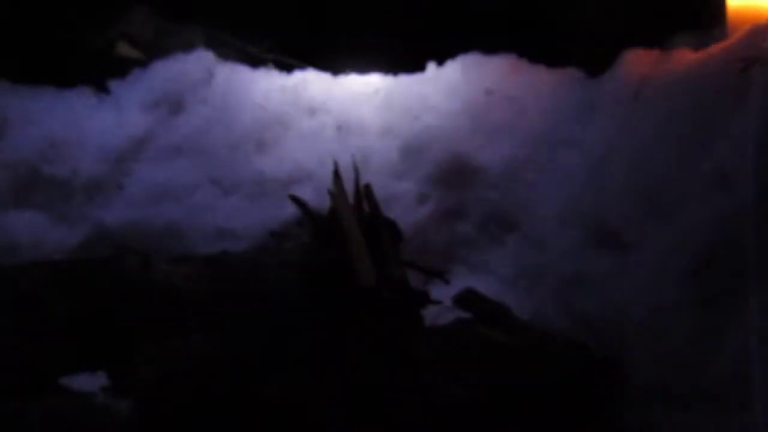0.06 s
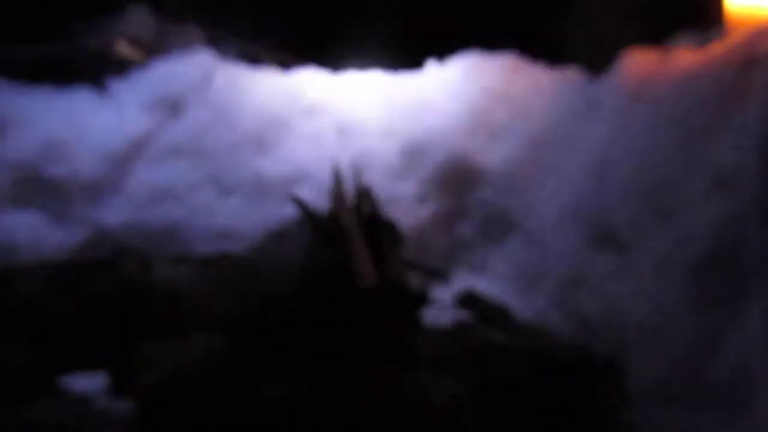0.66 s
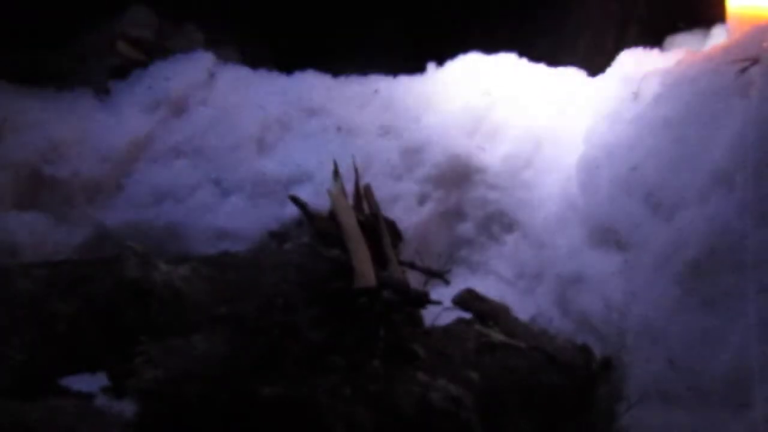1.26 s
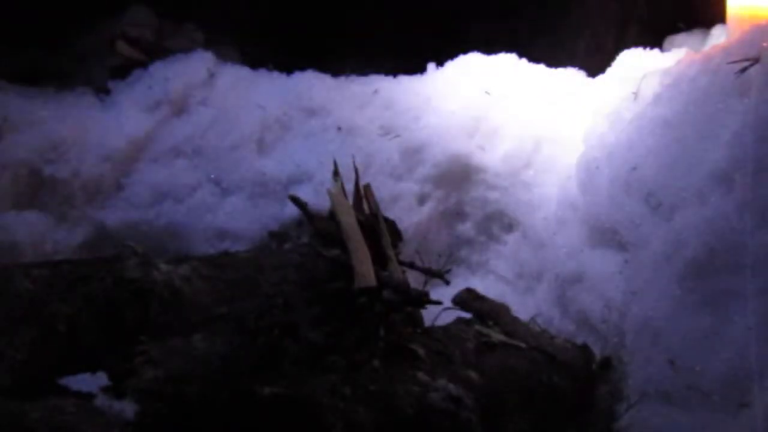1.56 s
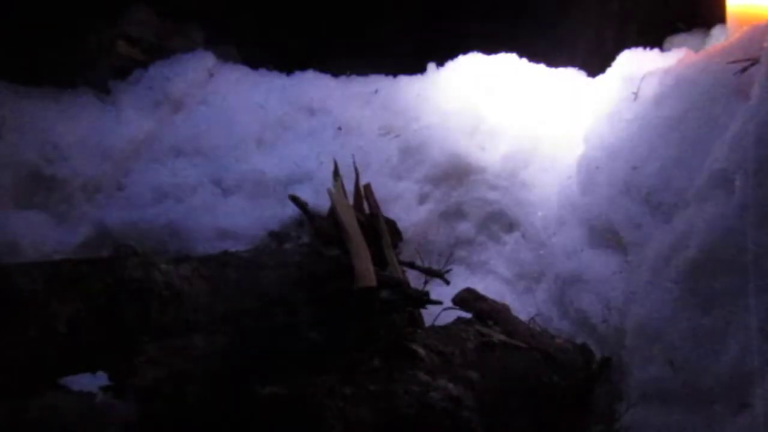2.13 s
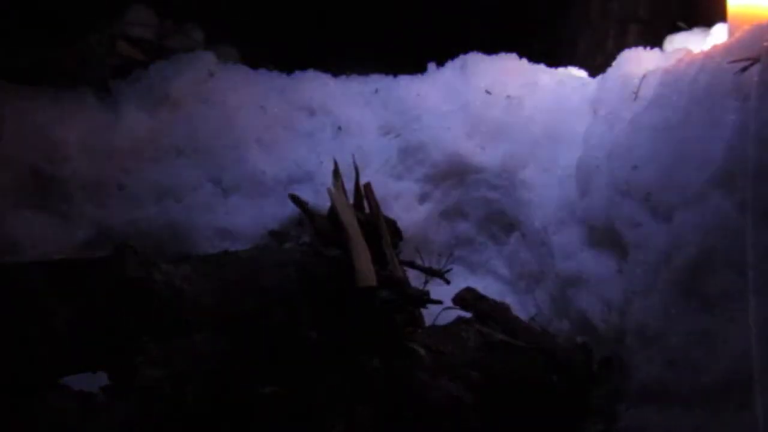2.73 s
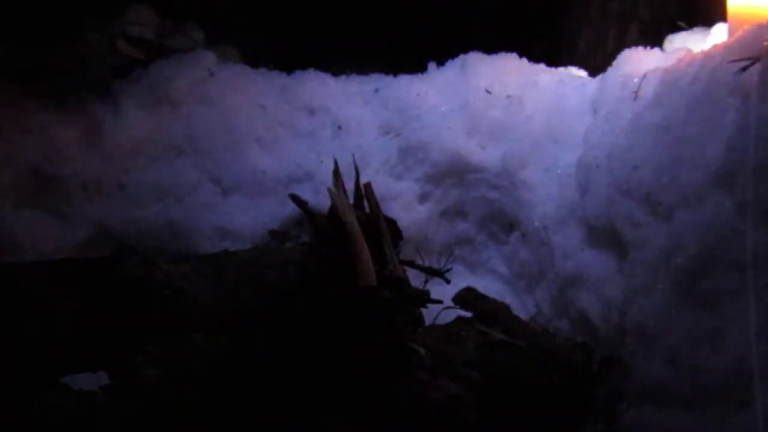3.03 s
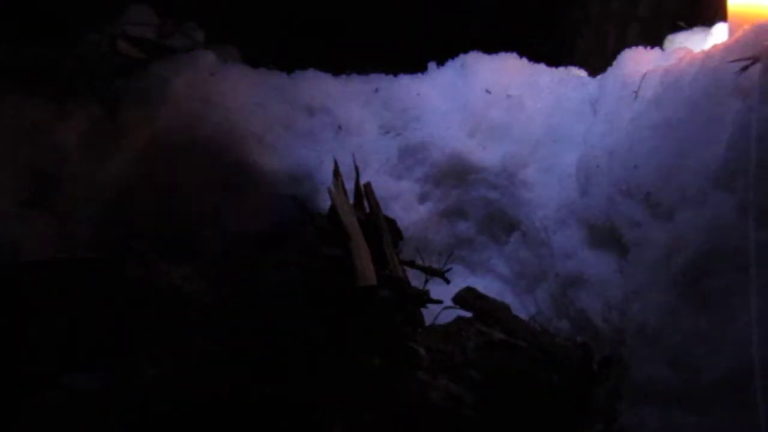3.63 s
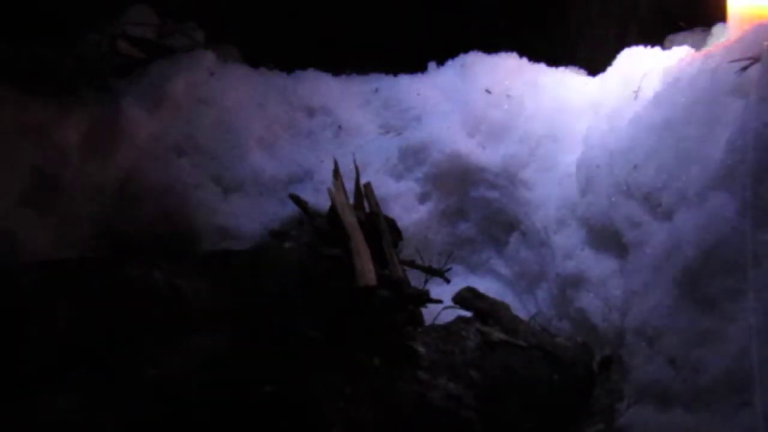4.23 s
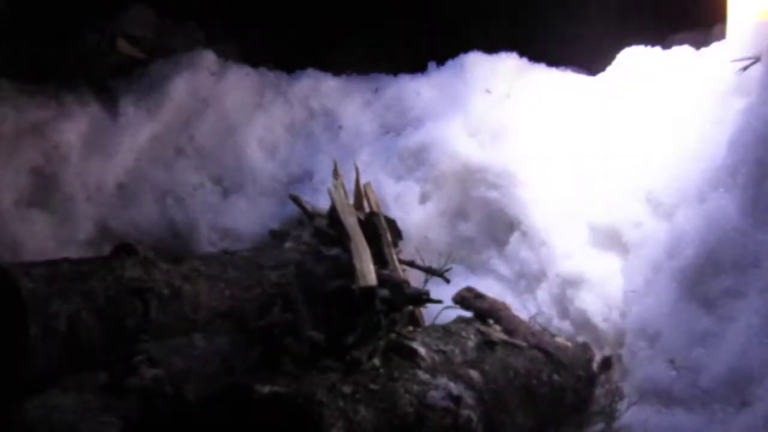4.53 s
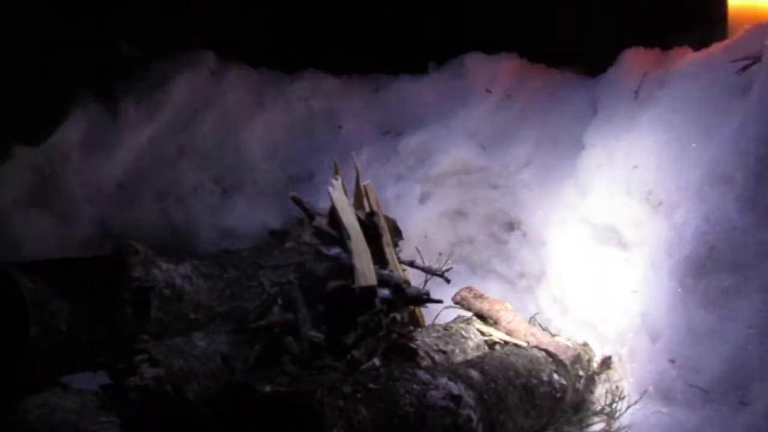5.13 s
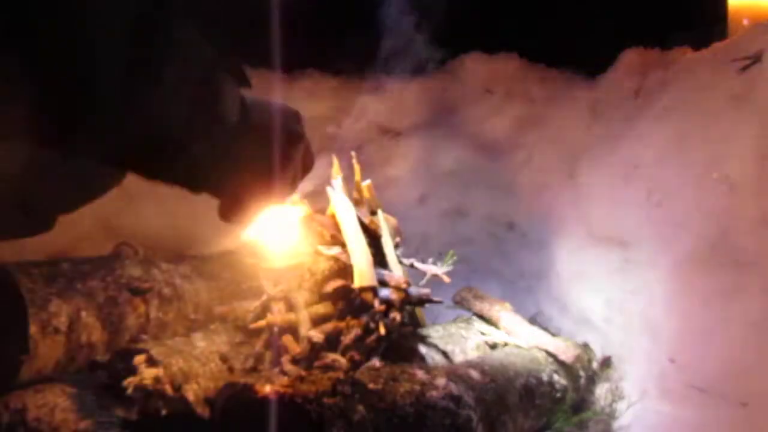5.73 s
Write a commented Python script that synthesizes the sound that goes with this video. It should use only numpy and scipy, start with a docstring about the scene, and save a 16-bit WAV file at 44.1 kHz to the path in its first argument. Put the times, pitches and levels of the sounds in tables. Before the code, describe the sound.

Sticks knock, snap and rustle close by as a small fire is laid, then a match is struck and flares.

```python
"""Sticks knock, scuff and snap as a small fire is laid in snow, close to the microphone.
Struck wood rings in damped modes; sleeves rustle in tiny friction slips; hands and logs thud on snow.
A cardboard matchbox slides open with a squeak and is turned in the fingers. A match is scraped once,
then struck at 5.1 s; gas from the burning head hisses and flares. The snow gives no reverberation."""
import sys
import numpy as np
from scipy import signal
from scipy.fft import rfft, irfft
from scipy.io import wavfile

SR = 44100
rng = np.random.default_rng(int(sys.argv[2]) if len(sys.argv) > 2 else 0)


def wav_record(signal):
    """Record a signal, one row per channel, as 16-bit PCM in the file named by sys.argv[1]."""
    frames = np.transpose(np.atleast_2d(signal))
    bounded = np.clip(frames, -1, 1)
    # unit amplitude maps onto the largest positive 16-bit level
    quanta = np.round(bounded * 32767).astype(np.int16)
    wavfile.write(sys.argv[1], SR, quanta)


N = 259749
TIME = np.arange(N) / SR
LEFT, NEAR_FRONT = 0.85, 0.32   # directions: 0 ahead, 1 full left

# Spectra of rubbing, dry hiss and grit. Each row: frequency in Hz, relative level in dB.
RUB_SPECTRUM = [(100, -40.5), (240, -15), (330, -1.5), (480, 2.5), (620, 1.5), (800, 0.5), (1100, -1),
                (1800, -4.5), (2600, -6.5), (3300, -20), (4200, -37), (8000, -64)]
HISS_SPECTRUM = [(1500, -5.5), (3000, 4.5), (4000, -5), (5000, 2.5), (6300, 2), (8000, -1.5), (10000, -5),
                 (12500, -11.5), (13800, -18), (15300, -34)]
GRIT_SPECTRUM = [(1500, -32.5), (3300, 9), (4300, 2.5), (5500, 8), (6400, 8.5), (7600, 3), (9300, 3),
                 (10500, -8.5), (13000, -4.5), (15800, -53)]


def kindling(rub):
    """Sticks knock, twigs snap into ringing splinters, and bark drags over bark."""
    # Each row: start in seconds, hiss in dB, rasp in dB, splinter pitch in Hz.
    snaps = [(.222, -33.5, -47, 5900), (0.274, -23.5, -23, 5500), (.448, -24.5, -30, 5630),
             (0.542, -30, -49, 6100), (0.5582, -28, -34.5, 6460), (0.608, -31.5, -27, 7060),
             (.764, -24.5, -29, 3650), (0.8338, -22.5, -25, 7000), (0.953, -33.5, -42, 7400),
             (1.042, -43, -52, 7600), (1.0657, -25.5, -30, 8200), (1.124, -34, -44, 5960),
             (1.163, -35.5, -34, 4300), (1.536, -36, -32, 5250), (1.554, -36, -44, 5560),
             (1.631, -42, -40, 2570), (2.088, -43, -38, 3000), (2.28, -23.5, -29, 6320),
             (2.445, -36, -32.5, 5220), (2.565, -26, -34, 4600), (2.936, -34, -47, 5770),
             (3.084, -46, -51, 5400), (3.343, -35, -38, 6840), (3.488, -46, -46, 5500),
             (3.531, -33, -41, 5940), (3.68, -29, -38, 6480), (3.987, -44.5, -69, 6950),
             (4.887, -37.5, -39, 5570)]
    # Each row: start in seconds, length in seconds, rasp in dB.
    scuffs = [(0.414, 0.022, -30), (.4245, 0.0059, -24.5), (0.441, 0.011, -26.5), (0.455, 0.034, -30),
              (0.475, .011, -35), (0.499, 0.026, -31), (0.718, 0.03, -34), (1.529, 0.02, -38),
              (2.311, 0.028, -37), (2.602, 0.012, -36), (3.572, 0.038, -35), (3.69, 0.017, -35),
              (3.758, 0.011, -34.5), (4.535, .025, -44.5)]
    snap_s, scuff_hiss_db = 0.00084, -6.5
    fractures = [(s, snap_s, rasp_db, hiss_db) for s, hiss_db, rasp_db, _ in snaps]
    drags = [(s, length_s, db, db + scuff_hiss_db) for s, length_s, db in scuffs]
    snap_gains = from_db(0.5) * bursts(fractures, rise_s=0.00017, fall_s=0.0032)
    rasp, hiss = snap_gains + bursts(drags, rise_s=0.00078, fall_s=0.0049)
    # Each row: frequency in Hz, relative level in dB.
    rasp_spectrum = [(150, -16), (450, 6), (900, 1), (1500, 0.5), (2050, 0.5), (2650, 3), (3400, -3),
                     (4200, -17), (7000, -39)]
    rasping = patchy(colour(friction(3900, 1.6, -0.37), rasp_spectrum), depth_db=3, rate_hz=46)
    hissing = colour(friction(7000, 2.4, -6.5), HISS_SPECTRUM)
    rings = splinters([(s, hiss_db - 1, hz) for s, hiss_db, _, hz in snaps], t60_cycles=185)
    wood = rasp * rasping + hiss * hissing + rings + stick_knocks(rub) + twig_clacks() + log_ring()
    return close_by(wood, LEFT)


def stick_knocks(rub):
    """Each blow rings a wooden stick's damped modes, with a contact tick and a short chatter; the blow at 5.1 s
    is the match knocking against the box as it is struck."""
    # Each row: start in seconds, level in dB, pitch in Hz, t60 in seconds. The row at 5.1012 s is the match
    # knocking the box during the strike.
    knocks = [(.0442, -24, 985, 0.03), (.199, -17, 1490, 0.017), (.2165, -20, 850, 0.024),
              (.2895, -11, 700, 0.017), (.4203, -9, 650, 0.013), (.4444, -13, 444, 0.029),
              (.501, -22, 650, .01), (.5797, -21.5, 764, 0.047), (.8341, -16, 890, 0.012),
              (.9148, -15, 1050, 0.011), (.9183, -12.5, 720, 0.034), (.9935, -21, 517, 0.035),
              (1.0119, -19.5, 280, 0.038), (1.1643, -23.5, 780, 0.028), (1.2322, -28.5, 840, 0.013),
              (1.271, -33, 1190, 0.023), (1.4722, -25, 1830, 0.012), (1.5848, -21, 395, 0.022),
              (1.5855, -26, 1800, .01), (1.7485, -28.5, 380, 0.01), (1.7707, -27, 483, 0.013),
              (1.84, -27.5, 203, 0.058), (1.8742, -16.5, 500, 0.021), (1.9055, -30, 640, 0.015),
              (2.3185, -18.5, 777, 0.033), (2.3988, -20.5, 730, 0.018), (2.5083, -11.5, 510, 0.037),
              (2.635, -26.5, 750, .022), (2.6525, -28.5, 720, 0.03), (2.72, -23, 777, 0.037),
              (2.786, -26, 710, 0.018), (2.9805, -18.5, 510, 0.021), (3.137, -29, 680, 0.0096),
              (3.207, -37, 715, .022), (3.5475, -12.5, 690, 0.011), (3.6809, -8, 716, 0.017),
              (3.6848, -16.5, 675, 0.047), (3.76, -21.5, 720, 0.018), (3.7678, -19, 518, 0.033),
              (3.824, -36, 700, 0.018), (4.1351, -27, 2100, 0.018), (4.1495, -35, 1990, 0.025),
              (4.18, -35, 1630, .025), (4.203, -25.5, 1780, 0.016), (4.2255, -33, 1350, 0.018),
              (4.3338, -36, 590, 0.058), (4.4025, -27.5, 1980, 0.011), (4.5402, -25.5, 600, 0.014),
              (4.5809, -26.5, 950, 0.015), (4.635, -30.5, 1980, 0.022), (4.669, -30, 2180, 0.016),
              (4.7367, -24, 574, 0.039), (4.7515, -28, 620, 0.028), (4.8022, -26, 1600, 0.0089),
              (4.807, -31, 575, 0.038), (4.8555, -30.5, 1000, 0.015), (4.8855, -23.5, 535, 0.028),
              (4.887, -24, 1870, 0.02), (4.903, -29, 1700, 0.015), (4.9789, -30.5, 583, 0.02),
              (4.994, -38, 553, 0.018), (5.053, -35, 480, 0.031), (5.0695, -34, 1010, 0.027),
              (5.0882, -23.5, 1700, 0.013), (5.0932, -24, 1700, 0.015), (5.1012, -10, 1870, 0.008),
              (5.3329, -19, 1300, 0.014), (5.488, -30, 1490, 0.0084), (5.5393, -25.5, 734, 0.026),
              (5.561, -29, 2130, 0.014), (5.8104, -25.5, 227, 0.045), (5.8562, -22.5, 550, 0.0099)]
    # Each row: multiple of the pitch, level in dB, multiple of the t60.
    stick_modes = [(.36, -31, 3.9), (0.681, 5.5, 1.24), (0.97, 18, 0.55), (1.401, 8.5, 0.91),
                   (2.2, -0.5, 0.54), (3.6, -45, 0.34)]
    blows = np.vstack([knocks, twig_ticks(rub, count=210)])
    ratio, mode_db, t60_ratio = np.transpose(stick_modes)[:, :, None]
    tick = colour(rng.standard_normal(N), GRIT_SPECTRUM)
    chatter = colour(friction(3000, 3.8, -3), RUB_SPECTRUM)
    out, t = np.zeros(N), TIME[:SR // 12]
    for start_s, level_db, hz, t60_s in blows:
        detune, strength = rng.standard_normal((2, len(stick_modes), 1))
        mode_hz = hz * ratio * np.exp(0.04 * detune)
        modes = np.sin(2 * np.pi * mode_hz * t) * from_db(mode_db + 1.5 * strength)
        swell = 1 - np.exp(-t * hz * ratio / 0.42)   # soft wood: builds over about a cycle
        ring = np.sum(modes * swell * from_db(-60 * t / (t60_s * t60_ratio)), axis=0)
        at = int(start_s * SR)
        n = min(len(t), N - at)
        hit = ring[:n] / np.abs(ring).max()
        hit += from_db(-28) * tick[at:at + n] * np.exp(-t[:n] / 0.0009)
        hit += from_db(-14.5) * chatter[at:at + n] * np.exp(-t[:n] / (0.23 * t60_s))
        out[at:at + n] += from_db(level_db) * hit
    return out


def twig_ticks(rub, count):
    """Knock rows for small twigs that touch at random, louder with stronger rubbing."""
    low_hz, high_hz, t60_cycles, over_rub_db, spread_db = 429, 2570, 15.2, 4, 8.5
    when, size, pitch = rng.random((count, 3)).T
    at = (when * (N - 1)).astype(int)
    hz = low_hz * (high_hz / low_hz) ** pitch
    level_db = 20 * np.log10(rub[at]) + over_rub_db + spread_db * size
    return np.column_stack([TIME[at], level_db, hz, t60_cycles / hz])


def twig_clacks():
    """Dry twigs ring on one clear note; faint overtones die sooner."""
    # Each row: start in seconds, level in dB, pitch in Hz, t60 in seconds.
    clacks = [(.199, -21.5, 2200, .012), (.8342, -19.5, 2360, .014), (1.067, -33, 3150, .014),
              (2.5645, -23, 2650, 0.051), (2.9365, -25.5, 1725, 0.034)]
    # Each row: multiple of the pitch, level in dB.
    twig_modes = [(1, -3), (1.2, -19), (1.78, -16), (2.76, -14)]
    out, t = np.zeros(N + SR), TIME[:SR // 15]
    for start_s, level_db, hz, t60_s in clacks:
        at = int(start_s * SR)
        for ratio, mode_db in twig_modes:
            envelope = from_db(level_db + mode_db - 60 * t * np.sqrt(ratio) / t60_s)
            out[at:at + len(t)] += envelope * np.sin(2 * np.pi * hz * ratio * t)
    return out[:N]


def log_ring():
    """Harder knocks ring the log under the kindling with a hollow note."""
    # Each row: start in seconds, level in dB.
    log_hits = [(0.291, -25.5), (.446, -24), (0.839, -25), (.866, -22.5), (0.92, -17), (1.021, -20.5),
                (2.511, -21.5), (3.685, -27)]
    # Each row: frequency in Hz, level in dB, t60 in seconds.
    log_modes = [(492, -5, 0.075), (850, -12, 0.08), (1300, -33, 0.025)]
    t = TIME[:SR // 5]
    ring = sum(from_db(db - 60 * t / t60_s) * np.sin(2 * np.pi * hz * t) for hz, db, t60_s in log_modes)
    return signal.oaconvolve(impulses(log_hits), ring)[:N]


def splinters(rows, t60_cycles):
    """Thin splinters ring on two close modes. Each row: start in seconds, level in dB, pitch in Hz."""
    out, t = np.zeros(N + SR), TIME[:SR // 25]
    for start_s, level_db, hz in rows:
        at, phase = int(start_s * SR), 2 * np.pi * hz * t
        ring = (np.sin(phase) - np.sin(1.1 * phase)) / 2
        out[at:at + len(t)] += ring * from_db(level_db - 60 * hz * t / t60_cycles)
    return out[:N]


def match_strike():
    """The head grinds over the gritty striker, shakes the box and cracks as it catches."""
    # Each row: start in seconds, length in seconds, rasp in dB, grit in dB, box ring in dB.
    strokes = [(4.2438, .001, -34, -27, -37), (4.247, .0045, -28, -23, -26.5),
               (4.254, .0015, -33, -31, -38), (4.258, .006, -38, -37, -39), (5.083, .015, -44, -54, -57),
               (5.1007, .0012, -35, -37, -48), (5.1040, .001, -23, -24, -37),
               (5.110, .006, -20, -20.5, -34), (5.116, .04, -29.5, -31, -43)]
    # The box behind the striker. Each row: frequency in Hz, width in Hz, level in dB.
    striker_modes = [(1410, 140, -3), (1670, 140, -6), (2230, 150, 3), (2980, 290, -1), (3390, 250, 5),
                     (5970, 260, 7), (6200, 210, 5.5), (7000, 370, -1)]
    # Each row: start in seconds, level in dB.
    ignition_cracks = [(5.1050, .5), (5.1104, -10), (5.1288, -17), (5.1356, -13), (5.1425, -12),
                       (5.1492, -14), (5.1530, -17)]
    # Each row of both: frequency in Hz, relative level in dB.
    striker_spectrum = [(100, -20), (350, -9), (750, 5), (950, 2), (1120, 4.5), (1400, -0.5), (1900, 6),
                        (2400, -3), (2950, 3.5), (4000, -7.5), (7000, -15), (15000, -34)]
    crack_spectrum = [(100, -15), (500, -6), (1200, 6), (2800, 10), (4000, -7), (6500, -1), (9500, 1),
                      (12000, -11), (15500, -48)]
    rasp, grit, ring = bursts(strokes, rise_s=0.00015, fall_s=0.002)
    grains = friction(4500, 3.1, -5.5)
    scrape = rasp * colour(grains, striker_spectrum) + grit * colour(grains, GRIT_SPECTRUM)
    scrape += ring * resonate(grains, striker_modes)
    clicks = impulses(ignition_cracks)
    cracks = colour(clicks, crack_spectrum)
    cracks *= clicks.max() / np.abs(cracks).max()
    return close_by(scrape, NEAR_FRONT, scatter_db=-16) + close_by(-cracks, NEAR_FRONT, scatter_db=-15)


def match_flare():
    """Gas spits from the burning head: a fizz that grows, spurts and sinks, with short jet notes."""
    # Each row: frequency in Hz, relative level in dB.
    flame_spectrum = [(200, -20), (500, -14), (800, -7), (1500, -4.5), (2600, -6.5), (4100, -13.5),
                      (5500, -8), (8000, -10.5), (10000, -13), (13000, -21), (15000, -40)]
    # Each row: pitch in Hz, width in Hz, level in dB, centre in seconds, Gaussian sigma in seconds.
    jet_notes = [(1380, 260, -41, 5.63, .025), (1460, 220, -31, 5.678, .013), (1420, 260, -39, 5.73, 0.028),
                 (1390, 260, -44, 5.85, .025), (2350, 320, -34, 5.695, 0.023),
                 (2330, 170, -38.5, 5.763, .016), (2270, 340, -39, 5.835, 0.034),
                 (3130, 300, -41, 5.68, 0.015), (3570, 320, -43, 6.4, .022), (3630, 300, -39, 5.686, 0.019),
                 (3850, 300, -50, 5.765, .015), (5400, 600, -50, 5.69, .03)]
    peak_s, spurt_s, grow_db_per_s, sink_db_per_s = 5.665, 0.017, 58, 39
    t = TIME - peak_s
    spurt_db = 10.5 * (t > 0) * np.exp(-np.abs(t) / spurt_s)   # the whole head goes up
    envelope = from_db(-39 + spurt_db + np.minimum(grow_db_per_s * t, -sink_db_per_s * t))
    fizz = colour(friction(2200, 3.1, -2.5) * from_db(1.8 * drift(80)), flame_spectrum)
    notes = sum(jet_note(hz, width_hz) * from_db(db) * np.exp(-0.5 * ((TIME - at_s) / sigma_s) ** 2)
                for hz, width_hz, db, at_s, sigma_s in jet_notes)
    direct = ports(from_db(1.5) * envelope * fizz + notes, LEFT)
    return direct + from_db(-4.5) * envelope * diffuse(flame_spectrum)


def jet_note(hz, width_hz, waver_hz=24.9):
    """Gas noise in a narrow resonance whose pitch wavers."""
    phase = 2 * np.pi * np.cumsum(hz + waver_hz * drift(40)) / SR
    return drift(width_hz) * np.cos(phase) + drift(width_hz) * np.sin(phase)


def matchbox():
    """The drawer slides open with a squeak; later, fingers turn and rub the cardboard box."""
    # Each row: start in seconds, length in seconds, scrape in dB, squeak in dB.
    box_scrapes = [(2.7168, 0.021, -25.5, -54), (2.741, 0.031, -36, -62), (2.771, 0.0045, -31, -36),
                   (2.776, 0.015, -37, -31.5), (2.837, 0.0099, -32, -37), (2.855, 0.0057, -40, -43),
                   (4.06, 0.11, -53, -70), (4.172, 0.023, -45.5, -66), (4.199, 0.0069, -41, -45),
                   (4.225, 0.015, -42.5, -66), (4.257, 0.009, -38, -41), (4.365, 0.038, -43.5, -52)]
    # Each row: frequency in Hz, width in Hz, level in dB.
    box_modes = [(700, 140, 9), (1310, 97, 11.5), (1600, 170, 7.5), (2140, 200, 12), (2470, 130, 13),
                 (2870, 110, 11), (3520, 250, -1), (4730, 150, 5), (5400, 120, -8)]
    squeak_hz, waver_hz, in_front_from_s = 2135, 40, 3
    scrape, _ = bursts(box_scrapes, rise_s=0.00034, fall_s=0.005)
    _, squeak = bursts(box_scrapes, rise_s=0.001, fall_s=0.0045)   # one cardboard mode builds and rings
    slips = friction(1500, 3.6, -3.5)
    cardboard = resonate(slips, box_modes) + from_db(-5.5) * colour(slips, GRIT_SPECTRUM)
    tone = np.sin(2 * np.pi * np.cumsum(squeak_hz + waver_hz * drift(300)) / SR)
    grip = from_db(9.5 + 2 * drift(400))   # uneven grip roughens the squeak
    box = scrape * cardboard + squeak * grip * tone
    in_front = TIME >= in_front_from_s
    return close_by(box * ~in_front, LEFT) + close_by(box * in_front, NEAR_FRONT)


def arm_movements():
    """Gains of rubbing, handling rumble and cloth hiss: each move speeds up, runs on and stops."""
    # Each row: start in seconds, rise in seconds, length in seconds, rubbing in dB, rumble in dB.
    moves = [(0.0, 0.026, 0.31, -35.5, -47.5), (0.407, 0.011, 0.25, -33.5, -39),
             (0.675, 0.017, 0.13, -34.5, -43), (0.95, 0.012, 0.24, -40.5, -46.5),
             (1.303, 0.039, 0.36, -49.5, -69), (1.515, 0.013, 0.063, -45.5, -44),
             (1.803, 0.039, 0.088, -51, -44), (2.086, 0.0077, 0.027, -34, -40.5),
             (2.128, 0.038, 0.42, -36.5, -44), (2.234, 0.071, 0.12, -32.5, -41.5),
             (2.49, 0.035, 0.031, -34.5, -49), (2.576, 0.034, 0.24, -51, -50),
             (2.969, 0.024, 0.096, -41, -46.5), (3.232, 0.044, 0.097, -36, -40.5),
             (3.348, 0.025, 0.13, -37.5, -49.5), (3.512, 0.052, 0.12, -32.5, -35),
             (3.654, 0.011, 0.14, -47, -44), (4.42, 0.061, 0.15, -45, -52.5),
             (4.602, 0.033, 0.39, -48, -52), (5.43, 0.34, 0.51, -40.5, -50.5)]
    # Light finger rustle. Each row: time in seconds, rubbing in dB, hiss in dB.
    fidget = [(0, -40.5, -51), (1.1, -43.5, -53.5), (1.26, -59, -62), (1.45, -46.5, -53),
              (1.72, -47.5, -62), (1.92, -46, -54.5), (2.1, -42, -54), (2.8, -47.5, -51.5),
              (3.18, -51, -55.5), (3.68, -40.5, -49.5), (3.85, -76, -65), (4.0, -57.5, -63),
              (4.35, -48.5, -55), (5.2, -49, -55.5), (5.89, -44, -50)]
    creep_db_per_s, stop_s = 0.5, 0.026
    power = np.zeros((2, N))
    for start_s, rise_s, length_s, *levels_db in moves:
        t = np.maximum(TIME - start_s, 0)
        stopping = np.exp(-np.clip(t - length_s, 0, 1) / stop_s)
        speed = np.minimum(t / rise_s, 1) * from_db(creep_db_per_s * t) * stopping
        power += (from_db(levels_db)[:, None] * speed) ** 2
    rub, rumble = np.sqrt(power)
    hiss = from_db(-17) * rub ** 0.87   # faster cloth hisses more
    times_s, *fidget_db = np.transpose(fidget)
    finger_rub, finger_hiss = (from_db(np.interp(TIME, times_s, db)) for db in fidget_db)
    return np.hypot(rub, finger_rub), rumble, np.hypot(hiss, finger_hiss)


def sleeves(rub, rumble, hiss):
    """Cloth rubs in uneven jerks; the hands also shake the microphone."""
    # Each row: frequency in Hz, relative level in dB.
    rumble_spectrum = [(20, -19), (50, -35), (100, -7), (170, 0.5), (280, 1), (450, -8), (900, -64)]
    jerk = drift(70)
    rubbing = patchy(colour(friction(900, 2.9, -2), RUB_SPECTRUM), depth_db=2, rate_hz=60)
    hissing = patchy(colour(friction(700, 4.4, 5.1), HISS_SPECTRUM), depth_db=2, rate_hz=37)
    shaking = patchy(colour(friction(250, 4, -5), rumble_spectrum), depth_db=4, rate_hz=30)
    # diffuse part: scatter from hands and snow
    rubbing = ports(rubbing, LEFT) + from_db(-14) * diffuse(RUB_SPECTRUM)
    hissing = ports(hissing, LEFT) + from_db(-4) * diffuse(HISS_SPECTRUM)
    shaking = ports(shaking, LEFT) + from_db(1) * diffuse(rumble_spectrum)
    cloth = rub * from_db(1.2 * jerk - 1) * rubbing + hiss * from_db(jerk + 2.5) * hissing
    return cloth + rumble * from_db(-1.5) * shaking


def fibre_crackles(hiss, count):
    """Dry fibres break at random, louder as the cloth moves faster."""
    low_hz, high_hz, over_hiss_db, spread_db = 4060, 8540, 5, 4.5
    when, chance, pitch = rng.random((count, 3)).T
    at = (when * (N - 1)).astype(int)
    size = np.minimum(-np.log(1 - chance), 3)
    level_db = 20 * np.log10(hiss[at]) + over_hiss_db + spread_db * size
    hz = low_hz * (high_hz / low_hz) ** pitch
    return close_by(splinters(zip(TIME[at], level_db, hz), t60_cycles=11), LEFT)


def snow_thuds():
    """Hands and logs bump packed snow: a low, heavily damped swing of the ground."""
    # Each row: start in seconds, level in dB, pitch in Hz.
    bumps = [(.44, -21, 217), (0.841, -34, 96), (1.01, -31, 147), (2.276, -28, 117), (2.51, -24.5, 129),
             (2.98, -39, 97.5), (3.484, -35, 139), (3.566, -49, 105), (3.681, -33, 107), (3.776, -23, 196),
             (4.537, -44, 109), (5.103, -39, 101), (5.808, -44, 142)]
    rise_cycles, t60_cycles = 0.45, 6.1
    out = np.zeros(N)
    for start_s, level_db, hz in bumps:
        at = int(start_s * SR)
        cycles = hz * TIME[:min(SR // 5, N - at)]
        shape = (1 - np.exp(-cycles / rise_cycles)) * from_db(-60 * cycles / t60_cycles)
        out[at:at + len(cycles)] += from_db(level_db) * shape / shape.max() * np.sin(2 * np.pi * cycles)
    return ports(out, LEFT)


def air():
    """Faint steady outdoor noise."""
    # Each row: frequency in Hz, relative level in dB.
    air_spectrum = [(25, -30), (100, 3), (500, 0), (1300, -5.5), (2700, -10), (4000, -28), (5800, -23),
                    (9500, -18.5), (13000, -36), (15000, -53)]
    return from_db(-51.5) * diffuse(air_spectrum)


def friction(slips_per_s, spread_db, smooth_db):
    """Tiny random slips of uneven size over smooth sliding noise; rms 1."""
    sizes = from_db(spread_db * np.minimum(rng.exponential(1, N), 4)) * rng.choice([-1, 1], N)
    slips = rms_one(sizes * (rng.random(N) < slips_per_s / SR))
    return rms_one(slips + from_db(smooth_db) * rng.standard_normal(N))


def bursts(rows, rise_s, fall_s):
    """One gain curve per dB column: each contact grips, holds for its length and dies away."""
    out = np.zeros((len(rows[0]) - 2, N))
    for start_s, length_s, *levels_db in rows:
        at = int(start_s * SR)
        t = TIME[:min(SR // 5, N - at)]
        shape = (1 - np.exp(-t / rise_s)) * np.exp(-np.maximum(t - length_s, 0) / fall_s)
        out[:, at:at + len(t)] += from_db(levels_db)[:, None] * shape
    return out


def impulses(rows):
    """One-sample clicks. Each row: time in seconds, level in dB."""
    times_s, levels_db = np.transpose(rows)
    clicks = np.zeros(N)
    clicks[(times_s * SR).astype(int)] = from_db(levels_db)
    return clicks


def patchy(x, depth_db, rate_hz):
    """Each octave swells and fades by itself as the contact point moves; rms 1."""
    octave = np.clip(np.log2(np.fft.rfftfreq(2 ** 18, 1 / SR) / 100 + 1e-9), 0, 7)
    spectrum = rfft(x, 2 ** 18)
    bands = (irfft(spectrum * np.maximum(1 - np.abs(octave - k), 0))[:N] for k in range(8))
    return rms_one(sum(band * from_db(depth_db * drift(rate_hz)) for band in bands))


def resonate(x, modes):
    """Parallel resonances of alternating sign; rms 1."""
    out = 0
    for k, (hz, width_hz, db) in enumerate(modes):
        radius = np.exp(-np.pi * width_hz / SR)
        feedback = [1, -2 * radius * np.cos(2 * np.pi * hz / SR), radius ** 2]
        out += (-1) ** k * from_db(db) * (1 - radius ** 2) * signal.lfilter([1, 0, -1], feedback, x)
    return rms_one(out)


def colour(x, spectrum, size=2048):
    """Minimum-phase filter with the given spectrum; rms 1."""
    hz, db = np.transpose(spectrum)
    grid_hz = np.maximum(np.fft.rfftfreq(size, 1 / SR), 1)
    cepstrum = irfft(np.log(from_db(np.interp(np.log(grid_hz), np.log(hz), db))))
    cepstrum[1:size // 2] *= 2
    cepstrum[size // 2 + 1:] = 0
    response = irfft(np.exp(rfft(cepstrum)))
    return rms_one(signal.oaconvolve(x, response)[:N])


def close_by(x, side, scatter_db=-5):
    """Direct sound plus a few milliseconds of treble scattered by hands and wood."""
    t = TIME[:SR // 60]
    paths = rng.standard_normal((2, len(t))) * (1 - np.exp(-t / 0.0004)) * np.exp(-t / 0.0035)
    paths /= np.sqrt(np.sum(paths ** 2, axis=1, keepdims=True))
    paths = signal.sosfilt(signal.butter(1, 2800, "high", fs=SR, output="sos"), paths)
    return ports(x, side) + from_db(scatter_db) * signal.oaconvolve(x[None], paths, axes=1)[:, :N]


def ports(x, side):
    """Sound reaches the left microphone port first; the housing shades some bands."""
    # Source at full left. Each row: frequency in Hz, left lead in radians, left over right in dB.
    port_response = [(0, 0.5, 1), (500, 0.31, 2.2), (3460, 0.51, 3), (6000, 1.2, 1.5), (8360, 1.86, -0.5),
                     (10000, 2.95, -3), (12700, 4.2, 1), (15600, 1.8, 1)]
    hz, lead_rad, left_db = np.transpose(port_response)
    grid_hz = np.fft.rfftfreq(2 ** 18, 1 / SR)
    shade = from_db(side * np.interp(grid_hz, hz, left_db) / 2)
    delay = np.exp(-1j * side * np.interp(grid_hz, hz, lead_rad))
    return irfft(rfft(x, 2 ** 18) * np.array([shade, delay / shade]))[:, :N]


def diffuse(spectrum):
    """Coloured noise, unrelated at the two ports."""
    return np.array([colour(rng.standard_normal(N), spectrum) for _ in range(2)])


def drift(rate_hz):
    """Random curve through about rate_hz points a second; rms 1."""
    position = TIME * np.clip(rate_hz, 1, 600)
    return rms_one(np.interp(position, np.arange(4000), rng.standard_normal(4000)))


def from_db(db):
    """Decibels to gain."""
    return 10 ** (np.asarray(db) / 20)


def rms_one(x):
    """Scale to rms 1."""
    return x / np.sqrt(np.mean(x ** 2) + 1e-20)


def scene():
    """Laying the fire and lighting the match, over faint air; stereo."""
    rub, rumble, hiss = arm_movements()
    laying = sleeves(rub, rumble, hiss) + kindling(rub) + fibre_crackles(hiss, count=400) + snow_thuds()
    return laying + matchbox() + match_strike() + match_flare() + air()


def record(dry):
    """A small microphone loses deep bass and top treble; clipping at full scale, then a steep low-pass."""
    thin = signal.sosfilt(signal.butter(3, 52, "high", fs=SR, output="sos"), dry)
    soft = signal.sosfilt(signal.butter(6, 14000, fs=SR, output="sos"), thin)
    return signal.sosfilt(signal.ellip(10, 0.2, 80, 15700, fs=SR, output="sos"), np.clip(soft, -1, 1))


dry = scene()
out = record(dry)
wav_record(out)
```